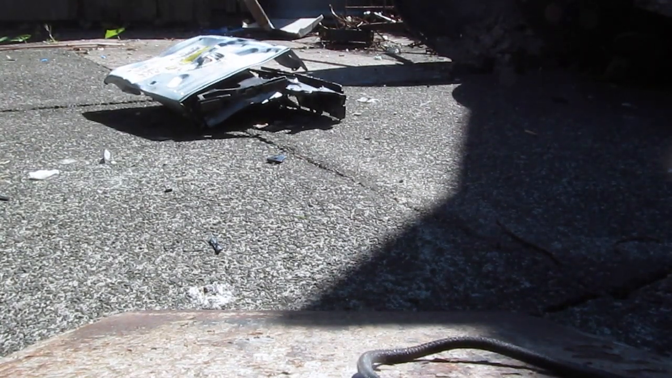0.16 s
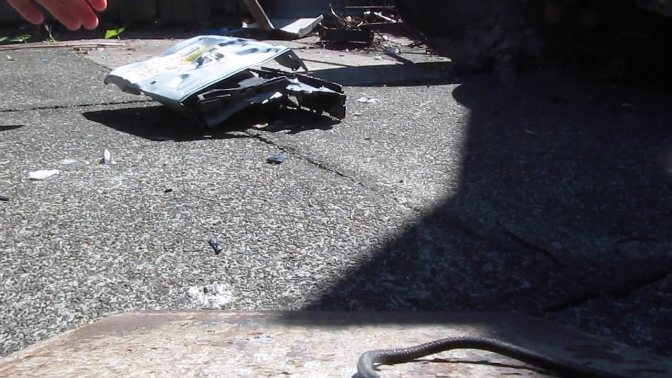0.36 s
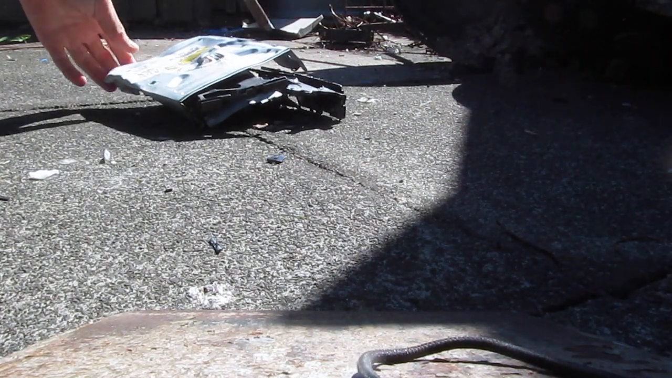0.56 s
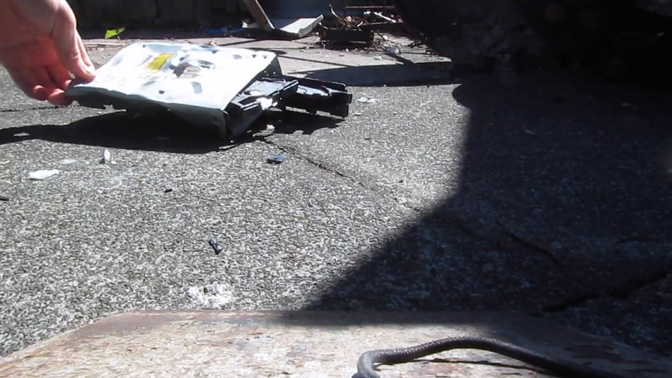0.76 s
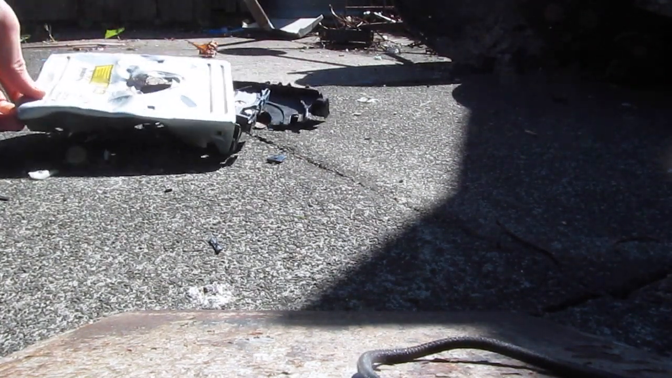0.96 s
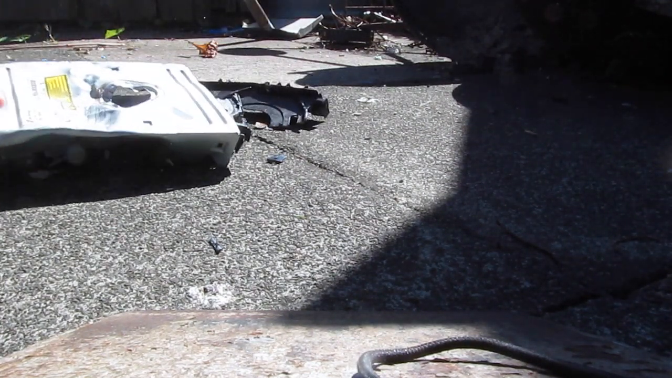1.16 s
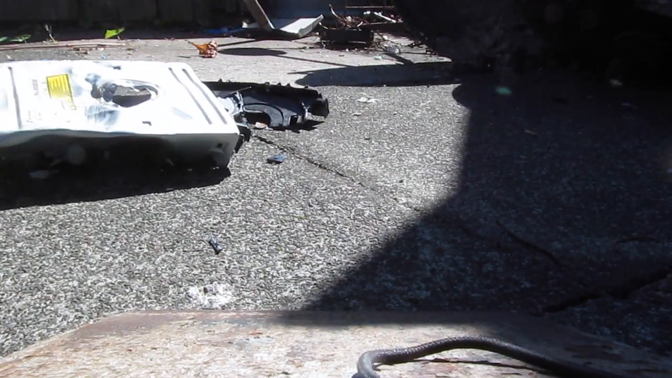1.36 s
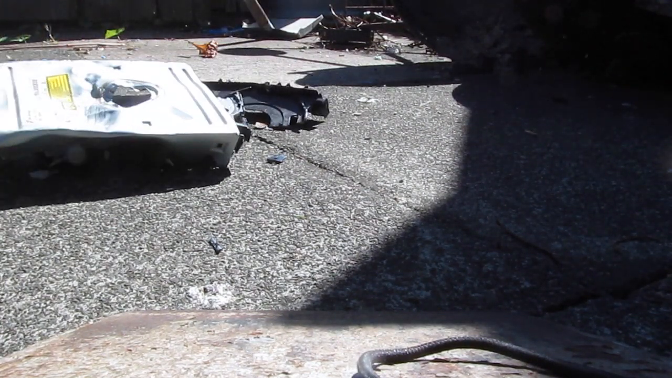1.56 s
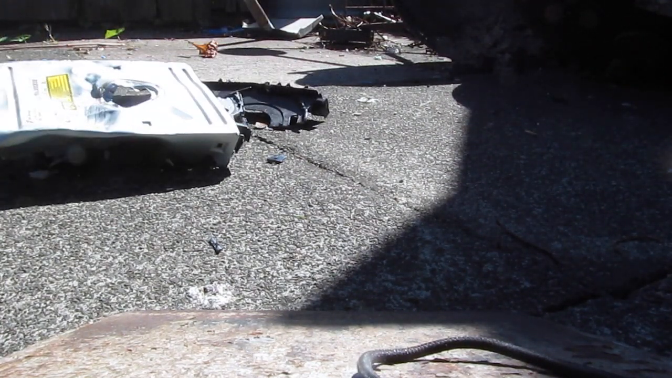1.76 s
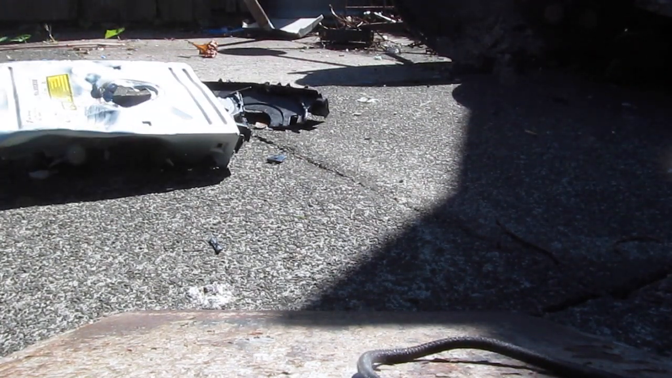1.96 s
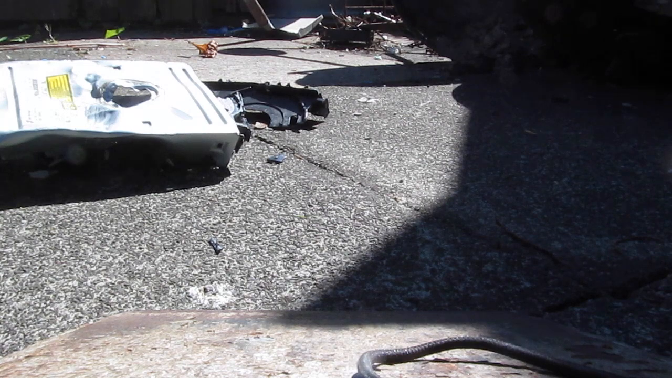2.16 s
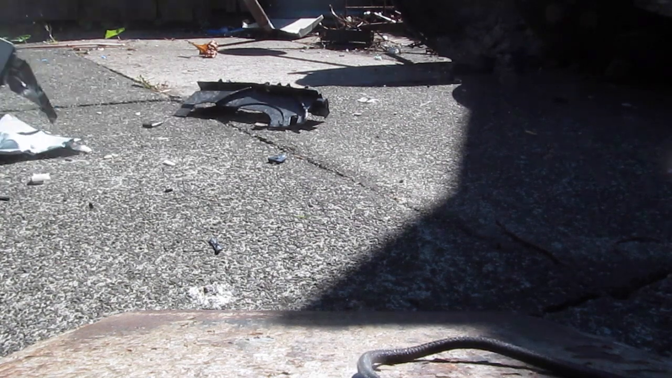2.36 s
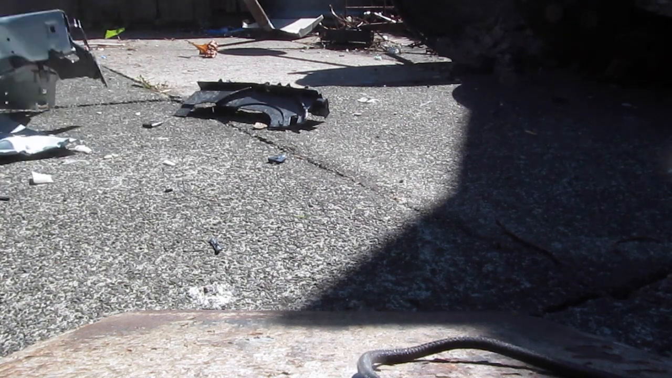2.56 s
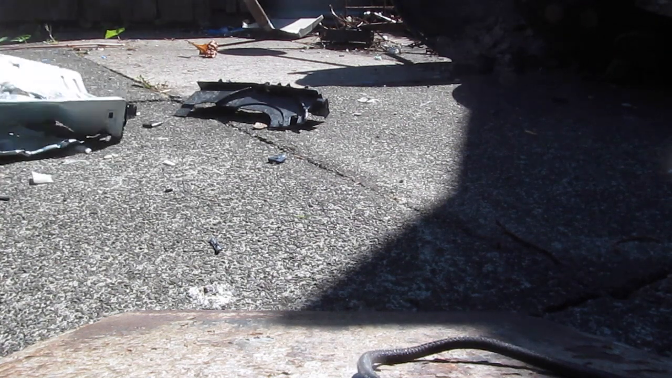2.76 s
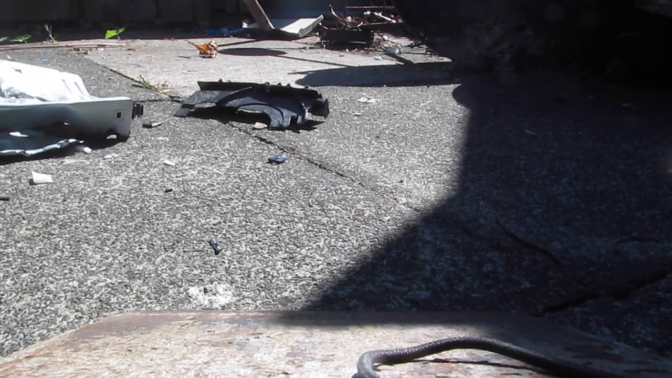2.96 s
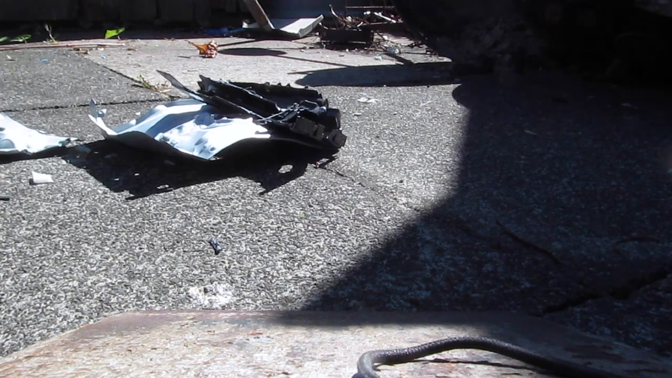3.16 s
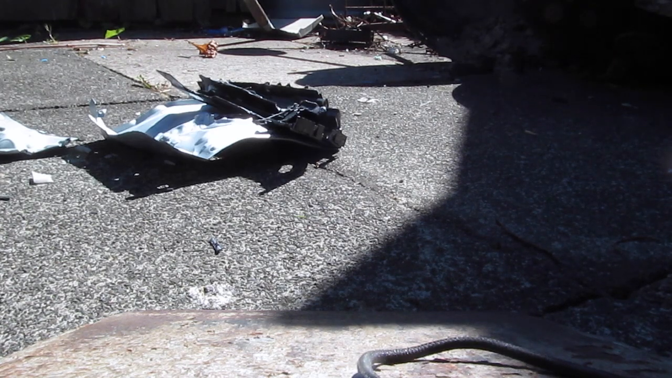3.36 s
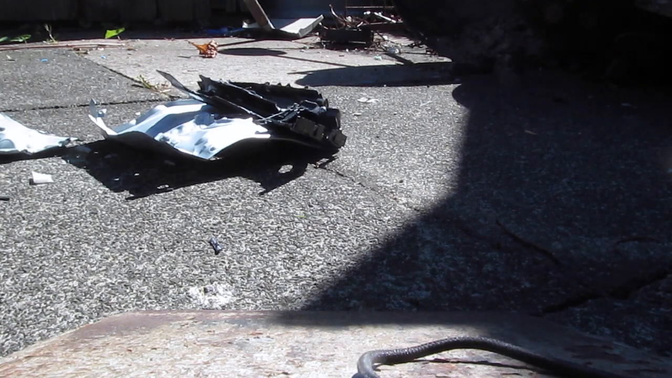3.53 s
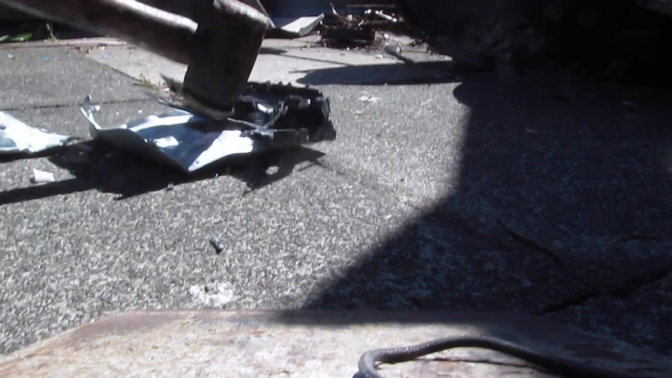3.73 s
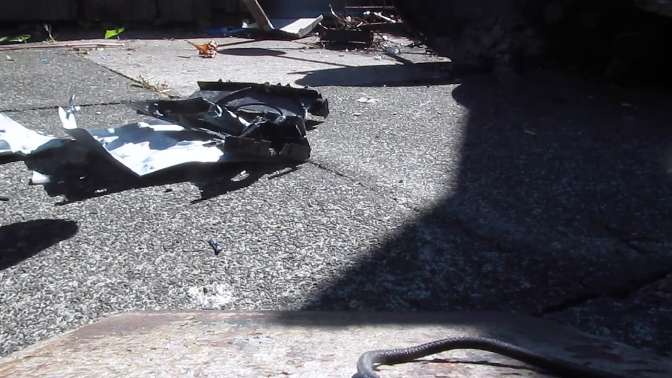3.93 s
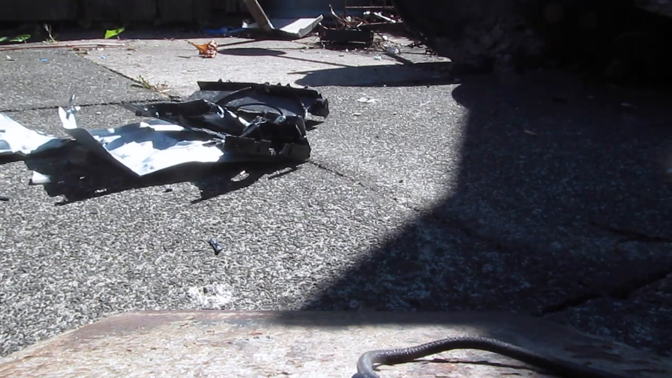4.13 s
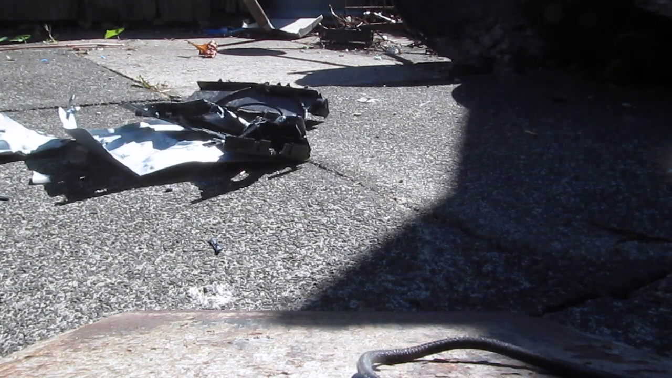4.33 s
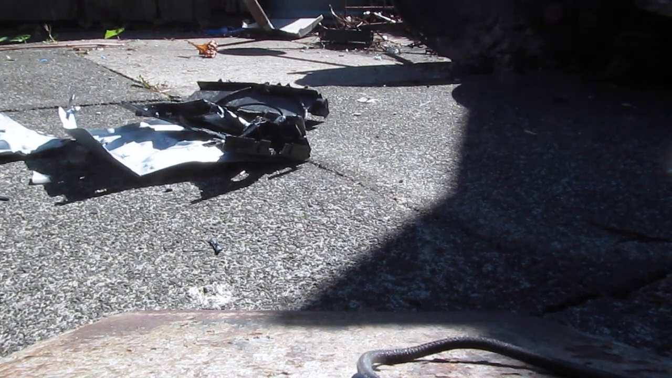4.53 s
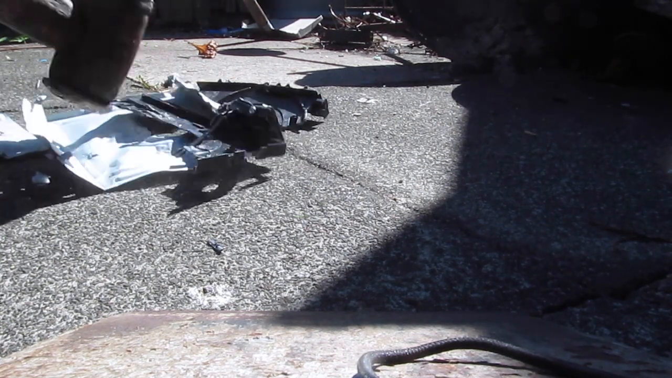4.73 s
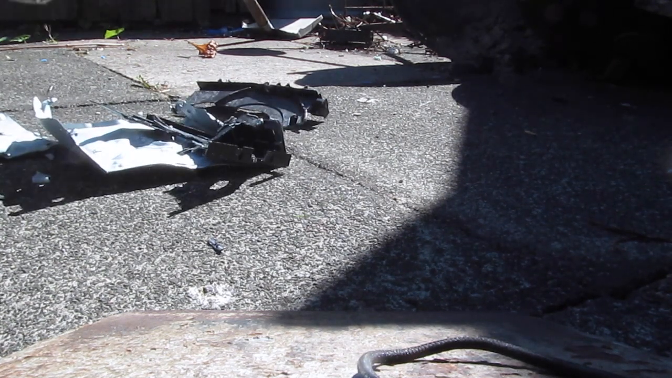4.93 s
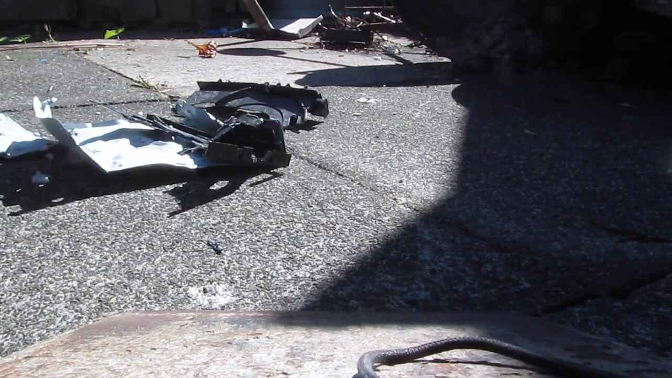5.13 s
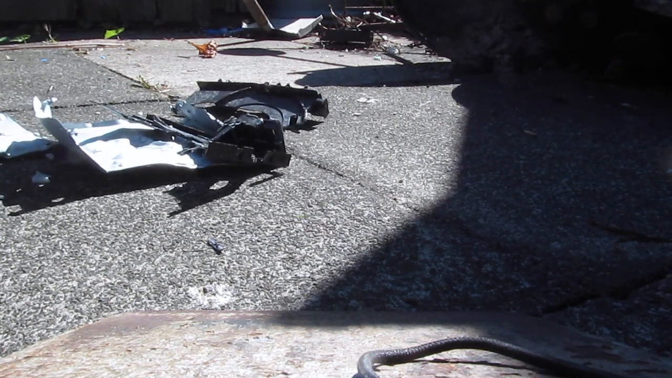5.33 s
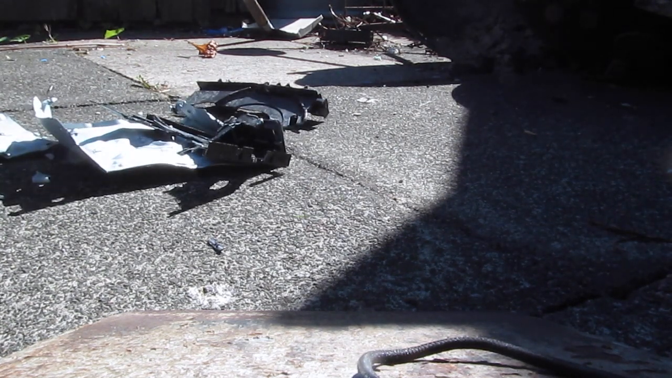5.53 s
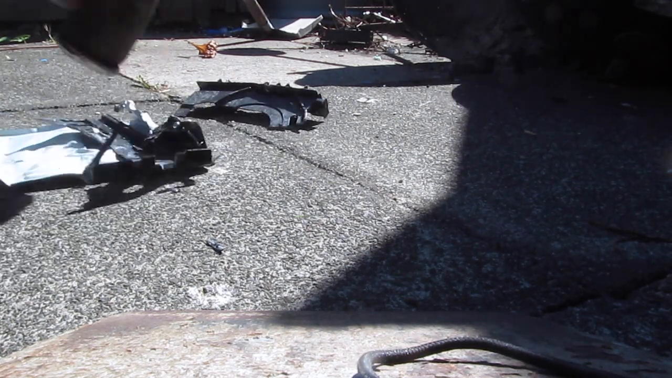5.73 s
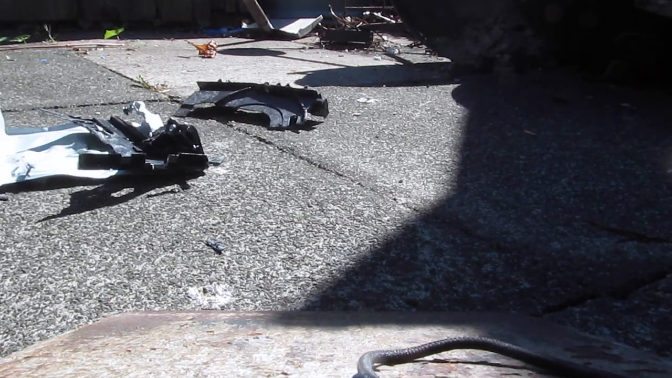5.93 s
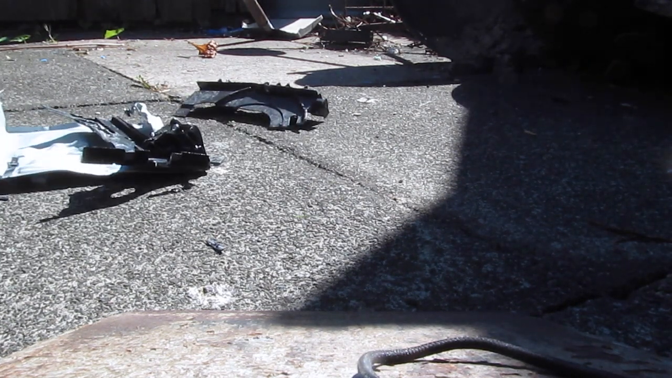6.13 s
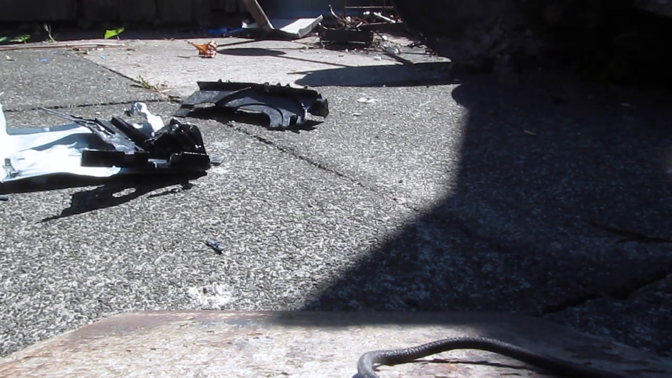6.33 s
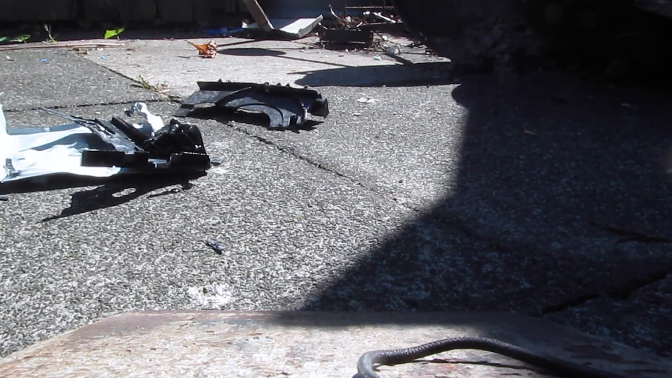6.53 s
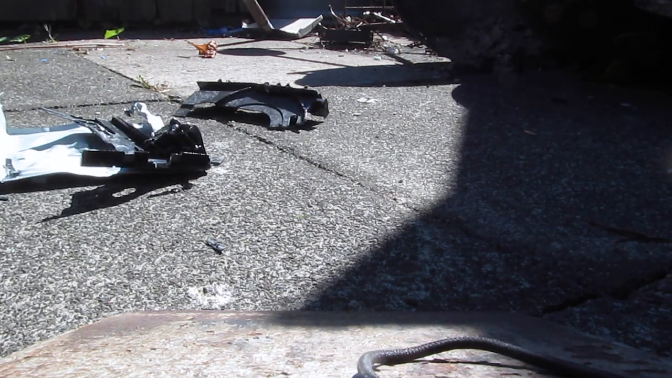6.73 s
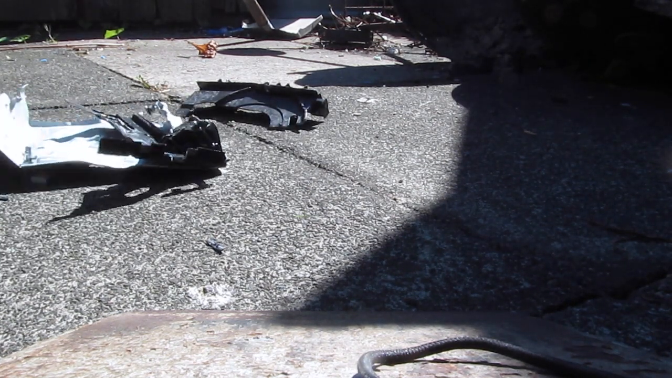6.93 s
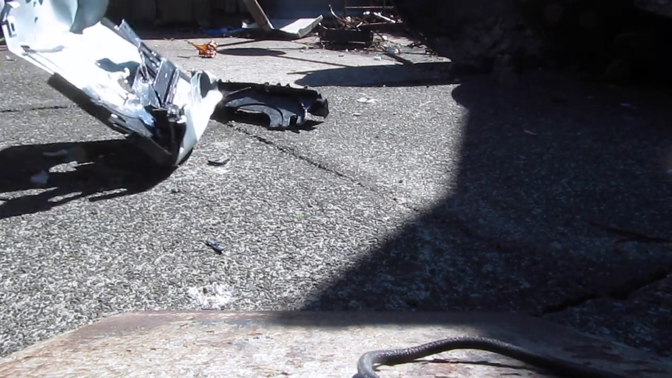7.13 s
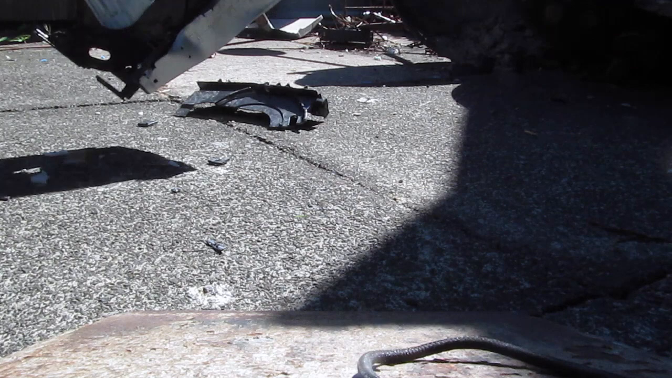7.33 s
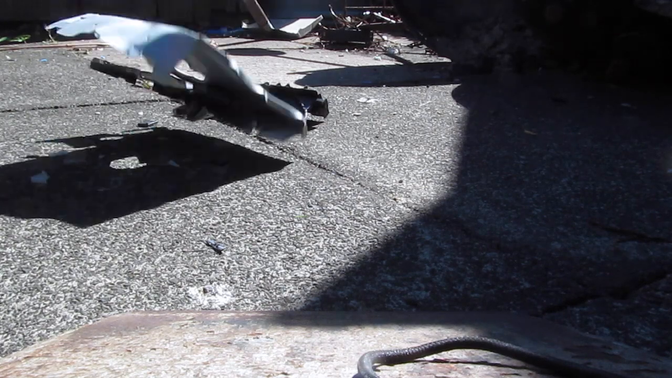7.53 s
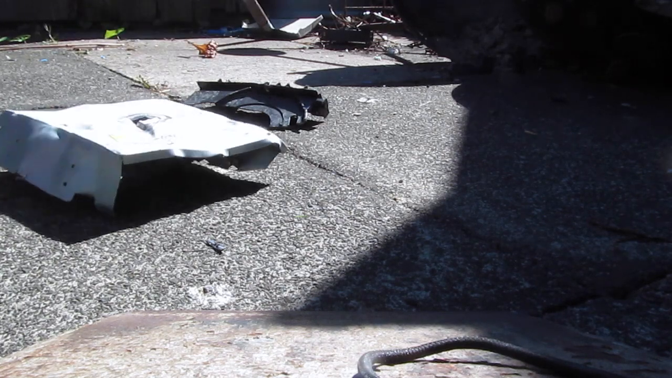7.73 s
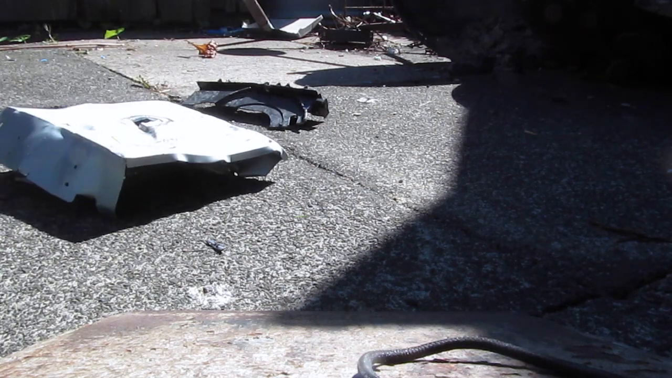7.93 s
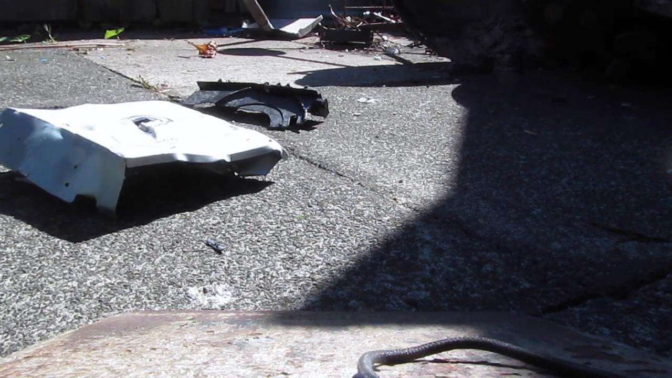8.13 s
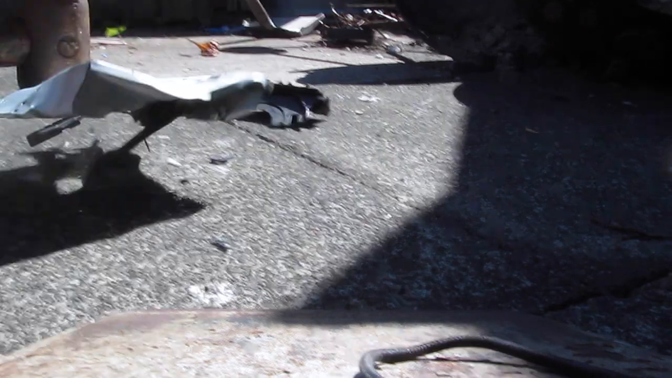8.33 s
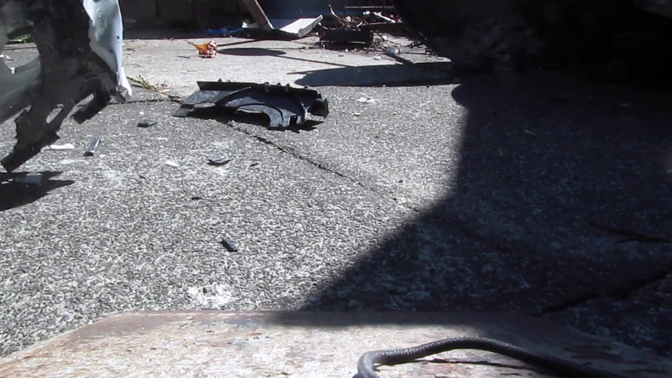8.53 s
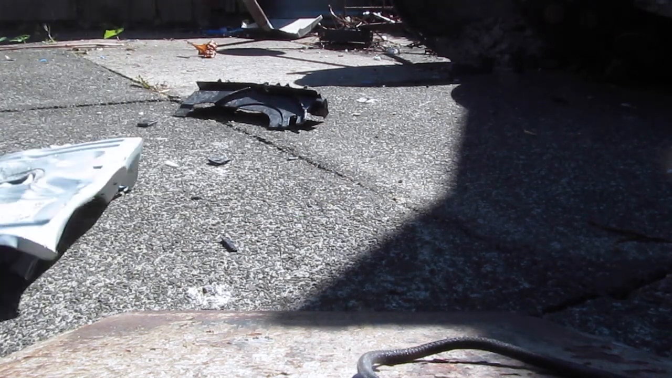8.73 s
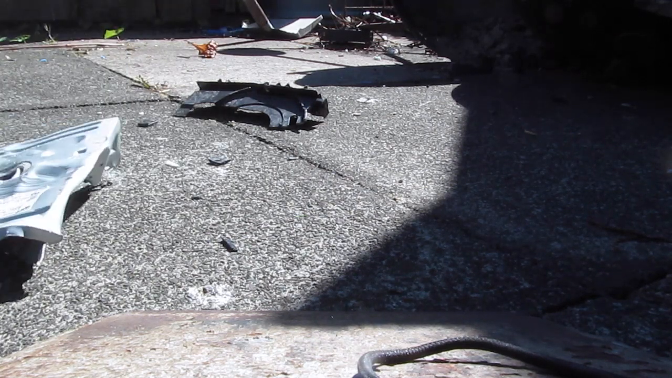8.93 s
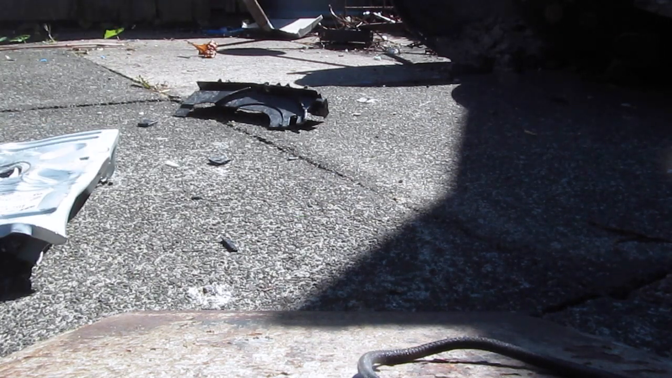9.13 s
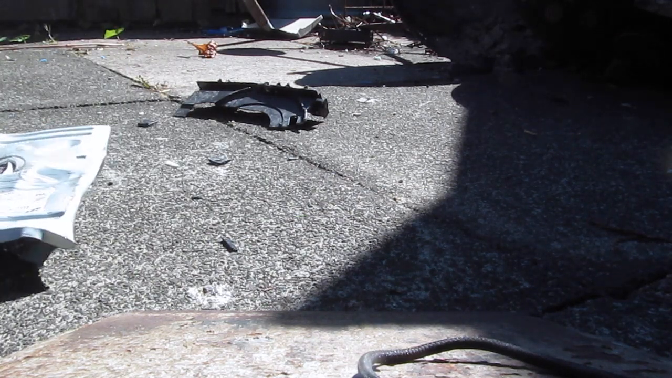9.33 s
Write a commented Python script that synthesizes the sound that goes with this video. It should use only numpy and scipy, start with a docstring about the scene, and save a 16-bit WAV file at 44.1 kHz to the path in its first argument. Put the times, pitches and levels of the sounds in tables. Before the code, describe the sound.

A bent metal and plastic case is scraped briskly across concrete paving, ringing thinly, then settles. A sledgehammer hits it five times with sharp, distorted cracks and short low thuds. After each blow the case skids, rattles and clinks; later it is turned over and dropped with a clatter before the last hit. Close stereo microphone outdoors between walls, short dull reflections, faint town hum.

```python
"""Outdoors between walls, over a faint town hum: a crumpled sheet metal and plastic case is dragged
over concrete paving and smashed with a sledgehammer, heard at two close microphone ports.
Contacts are rattle bursts ringing panel modes; slides are clumped grit through the same modes.
Blows also ring the slab low, free panels sing on, and filtered noise makes the town hum."""
import sys
import numpy as np
from scipy import signal
from scipy.fft import rfft, irfft
from scipy.io import wavfile
from scipy.ndimage import uniform_filter1d

SR = 44100
rng = np.random.default_rng(int(sys.argv[2]) if len(sys.argv) > 2 else 0)


def store_wav(level_fs):
    """Save 16-bit WAV to argv[1]."""
    pcm = np.round(np.clip(np.atleast_2d(level_fs), -1, 1) * 32767)
    wavfile.write(sys.argv[1], SR, pcm.T.astype(np.int16))


N = 413658

# lows, mids, highs: low_edge_hz, high_edge_hz
SPLIT_HZ = [(150, 1300), (1300, 5500), (5500, 19000)]


def from_db(db):
    """Decibels to gain."""
    return 10 ** (np.asarray(db) / 20)


def rms_one(x):
    """Scaled to rms 1."""
    return x / np.sqrt(np.mean(x ** 2) + 1e-20)


def peak_one(x):
    """Scaled to peak 1."""
    return x / np.max(np.abs(x))


def band(x, low_hz, high_hz, order=2):
    """Butterworth band-pass."""
    sos = signal.butter(order, [low_hz, high_hz], "band", fs=SR, output="sos")
    return signal.sosfilt(sos, x)


def coloured(x, spectrum):
    """Minimum-phase filter with the given spectrum, so nothing sounds early."""
    hz = np.maximum(np.fft.rfftfreq(4096, 1 / SR), 10)
    point_hz, point_db = np.transpose(spectrum)
    log_gain = np.interp(np.log(hz), np.log(point_hz), point_db) * np.log(10) / 20
    cepstrum = irfft(log_gain)
    cepstrum[1:2048] *= 2   # fold onto positive time
    cepstrum[2049:] = 0
    impulse = irfft(np.exp(rfft(cepstrum)))
    return signal.fftconvolve(x, impulse[None], axes=1)[:, :x.shape[1]]


def resonance(x, hz, width_hz):
    """Two-pole peak of gain 1."""
    r = np.exp(-np.pi * width_hz / SR)
    zeros = np.array([1, 0, -1]) * (1 - r * r) / 2
    poles = [1, -2 * r * np.cos(2 * np.pi * hz / SR), r * r]
    return signal.lfilter(zeros, poles, x)


# far traffic and air, relative spectrum: pitch_hz, density_db_per_hz
TOWN_SPECTRUM = [(20, -34.5), (60, -3.5), (200, -6), (650, -5.5), (1500, -12.5), (3000, -22.5), (7000, -27),
                 (16000, -52)]
# town levels: time_s, hum_130_to_2000_hz_db_rms, rumble_db_rms
TOWN_LEVELS = [(0, -75.5, -71.5), (0.898, -64, -75), (1.6, -71, -68), (2.1, -64, -68.5),
               (3.202, -63.5, -76), (3.6, -60, -61.5), (4.101, -75, -77), (5.201, -68.5, -81),
               (6.502, -69.5, -82), (7.201, -68, -68), (8.0, -68, -72), (9.38, -67.5, -75)]


def town():
    """Far traffic and air: smooth noise, with a low rumble that comes and goes."""
    s, hum_db, rumble_db = np.transpose(TOWN_LEVELS)
    t = np.arange(N) / SR
    common, left, right, low = rng.standard_normal((4, N))
    hum = coloured(np.array([common + .5 * left, common + .5 * right]), TOWN_SPECTRUM)
    hum = hum / np.sqrt(np.mean(band(hum, 130, 2000) ** 2))
    rumble = rms_one(band(low + .5 * np.array([left, right]), 33, 120, order=1))
    hum_gain = from_db(np.interp(t, s, hum_db))
    rumble_gain = from_db(np.interp(t, s, rumble_db))
    return hum_gain * hum + rumble_gain * rumble


# broad colour of a contact, relative: pitch_hz, density_db_per_hz
BODY = [(100, -39), (300, -13), (700, -5.5), (1300, -5), (2200, 0.5), (3500, -0.5), (6500, -9),
        (12000, -12.5), (16500, -23)]


def grit(per_s, spread_db):
    """Tiny uneven contacts coloured by the case; both ports hear nearly the same; rms near 1."""
    alike = .8   # left-right likeness, 0 to 1
    size_db = spread_db * np.minimum(rng.exponential(1, (2, N)), 4)
    sizes = from_db(size_db) * rng.choice([-1, 1], (2, N))
    ticks = sizes * (rng.random((2, N)) < per_s / SR)
    mid, side = rms_one(coloured(ticks, BODY))
    sides = np.sqrt(1 - alike) * side * np.array([[1], [-1]])
    return (np.sqrt(1 + alike) * mid + sides) / np.sqrt(2)


# panel modes, widths before damping: pitch_hz, width_hz, level_db
SHEET = [(354, 10, -8), (603, 15, -7.5), (950.3, 19, -3.5), (1144, 14, -4), (1380, 45, -1), (1685, 50, -4),
         (1928, 22, -8), (2212, 12, -3.5), (2688, 16, -7), (3113, 22, -10), (3630, 20, -7.5),
         (4460, 67, -8.5), (5100, 58, -6), (5360, 23, -7.5), (5850, 45, -8), (6560, 68, -5)]


def sheet(x, strengths_db, narrow, bend=1):
    """The dented panels ring at their modes, each as strongly as the contact point allows."""
    out = 0
    for k, ((hz, width_hz, level_db), strength_db) in enumerate(zip(SHEET, strengths_db)):
        mode = resonance(from_db(strength_db) * x, bend * hz, narrow * width_hz)
        out = out + from_db(level_db) * mode * (-1) ** k
    return out


def flexed(x):
    """The case flexes as it moves, so all its pitches wander (reading speed wavers)."""
    wander = .03   # rms, as a fraction of speed at each step
    steps = np.linspace(0, N, num=200)
    speed = 1 + wander * np.interp(np.arange(N), steps, rng.standard_normal(len(steps)))
    at = np.cumsum(speed)
    at += np.arange(N) - uniform_filter1d(at, size=SR // 4, mode="nearest")   # no lasting slip
    return np.array([np.interp(at, np.arange(N), row) for row in x])


# case pulled by hand: time_s, level_db_rms, highs_re_level_db
DRAG = [(0.551, -65.5, -11), (.61, -56, -28), (.7, -45.5, 4.5), (0.788, -24, 3), (.93, -26, -1.5),
        (.98, -23, -1.5), (1.14, -26.5, -4.5), (1.188, -31, -14.5), (1.242, -64.5, -11)]


def drag_gains(t):
    """Level and highs gains as the case is pulled over the paving by hand."""
    s, level_db, high_db = np.transpose(DRAG)
    level = from_db(np.interp(t, s, level_db, left=-200, right=-200))
    return level, level * from_db(np.interp(t, s, high_db))


def slides():
    """Edges catch on concrete grains in clumps; which panels ring keeps changing as the case rocks."""
    rumble_re_level_db, ring_db = -29, 13.0
    t = np.arange(N) / SR
    level, highs = np.add(drag_gains(t), skid_gains(t))
    clumps = from_db(3.3 * rms_one(band(rng.standard_normal(N), 15, 90)))
    scrape = grit(per_s=6000, spread_db=0.0) * clumps
    steps = np.linspace(0, t[-1], num=280)   # about 30 changes a second
    draws_db = rng.normal(0, 5, (len(SHEET), len(steps)))
    rocking_db = [np.interp(t, steps, row) for row in draws_db]
    scrape = scrape + from_db(ring_db) * flexed(sheet(scrape, rocking_db, narrow=0.89))
    rumble = from_db(rumble_re_level_db) * rms_one(band(scrape, 140, 380))
    high_edges_hz = SPLIT_HZ[-1]
    body = rms_one(band(scrape, 580, high_edges_hz[0]))
    return level * (body - rumble) - highs * rms_one(band(scrape, *high_edges_hz))


def contacts(rows, pans_db, rise_s, crack_db, sheet_db, ring_db):
    """Each contact: a short crack, then a burst of rattle that dies away and sets the panels ringing."""
    redent = .05   # rms pitch change from one contact to the next, fraction
    out, t = np.zeros((2, N)), np.arange(SR // 2) / SR
    rattle = grit(per_s=8000, spread_db=2.5)
    strengths = rng.standard_normal((len(rows), len(SHEET) + 1))
    for row, pan_db, strength in zip(rows, pans_db, strengths):
        start_s, mid_peak_db, low_db, high_db, t60_s, ring_hz, *_ = row
        at = round(start_s * SR)
        n = min(len(t), N - at, int(1.5 * t60_s * SR) + SR // 8)
        u = t[:n]
        fade = from_db(-60 * u / t60_s) + from_db(crack_db - 60 * u / 0.01)
        burst = rattle[:, at:at + n] * fade * np.minimum(u / rise_s, 1)
        damping = np.clip(.07 / t60_s, .8, 3)   # a dry contact widens every mode
        bend = 1 + redent * strength[0]
        ringing = from_db(sheet_db) * sheet(burst, 3.5 * strength[1:], damping, bend)
        ringing += from_db(ring_db) * resonance(burst, ring_hz, 80 * damping)
        burst = burst + ringing
        lows, mids, highs = (peak_one(band(burst, *edges_hz)) for edges_hz in SPLIT_HZ)
        # neighbouring bands meet in opposite phase
        mix = from_db(low_db) * lows - mids + from_db(high_db) * highs
        port_db = mid_peak_db + np.array([[pan_db], [-pan_db]]) / 2
        out[:, at:at + n] += from_db(port_db) * mix
    return out


# case and loose bits on paving: start_s, mid_peak_db, highs_re_mids_db, t60_s, ring_hz
KNOCKS = [(0.609, -40.5, -18, 0.067, 1290), (.631, -24, -2, 0.097, 4270), (0.697, -20.5, -1.5, 0.22, 1790),
          (0.7365, -23, -7, 0.057, 2550), (1.2514, -37.5, -9.5, 0.08, 3640), (1.8255, -39, -4, 0.06, 2600),
          (2.0258, -56, 15.5, 0.028, 3370), (2.3164, -24, -14, 0.55, 1310), (2.3338, -17, -15, 0.16, 1970),
          (2.4357, -15.5, -15, 0.2, 3065), (2.531, -28, -14, 0.15, 1570), (2.5693, -17.5, -13, 0.09, 2600),
          (2.593, -15, -14, 0.099, 1640), (2.6426, -18, -17, 0.097, 2840), (2.658, -24.5, -4, 0.14, 1560),
          (2.712, -31.5, -13, 0.08, 3000), (2.7481, -20.5, -9.5, 0.054, 1580),
          (2.799, -24, -25, 0.12, 2460), (2.823, -19.5, -8, 0.064, 2580), (2.8972, -31, -33, 0.18, 2740),
          (2.9478, -27.5, -21, 0.07, 2970), (2.9732, -22, -12, 0.023, 2860), (3.661, -48.5, 2, 0.058, 2600),
          (3.845, -25, -12, .083, 2500), (3.894, -25, -9, 0.25, 3540), (3.909, -26, -1, 0.051, 4430),
          (4.781, -25.5, -2, 0.12, 4500), (4.803, -22, 5.5, 0.07, 3950), (4.843, -20.5, -5.5, 0.2, 3870),
          (4.9489, -27.5, -15, 0.16, 1280), (5.03, -25.5, 5.5, 0.054, 2000),
          (5.1825, -29, 4.5, 0.051, 2270), (5.226, -37, -2, 0.057, 1980), (5.249, -56, 12, 0.052, 3600),
          (5.3103, -36.5, 5.5, 0.078, 3200), (5.38, -47, 10, 0.059, 3420), (5.539, -53, 2.5, .06, 4440),
          (5.627, -11, -8, 0.008, 2400), (5.6844, -17, 1.5, 0.089, 3420), (5.7515, -12.5, -12, 0.12, 2520),
          (5.857, -28.5, -6.5, 0.26, 3690), (5.9443, -31, -1, 0.052, 1960), (6, -20.5, -18, 0.17, 3090),
          (6.0195, -12, -5, 0.087, 1730), (6.0759, -20, -18, 0.32, 840), (6.1651, -20, -7, 0.18, 2760),
          (6.186, -15.5, -10, 0.19, 2030), (6.8803, -21.5, -12.5, 0.14, 1540),
          (6.9326, -24, -21, 0.054, 1500), (6.945, -18, -3.5, 0.085, 1510),
          (7.1533, -43.5, -27, 0.15, 1970), (7.5331, -13.5, 6, 0.12, 1700), (7.5738, -7, 5, 0.034, 3800),
          (7.648, -11.5, -1.5, 0.082, 1630), (7.7154, -16, 6, 0.14, 2630), (7.966, -39, 7.5, 0.1, 1550),
          (8.26, -48.5, -0.5, 0.033, 3160), (8.527, -43.5, 9, 0.057, 2460), (8.577, -52.5, 12, 0.12, 3040),
          (8.729, -18.5, -1, 0.081, 2230), (8.739, -11.5, -5, 0.07, 2155), (8.76, -20.5, -3, 0.13, 1940),
          (8.8493, -20, -1.5, .11, 1430), (8.907, -22, -3.5, 0.11, 1910), (9.027, -34.5, -9, 0.075, 1430),
          (9.0472, -25, -4.5, 0.25, 1470), (9.22, -51.5, 0, 0.11, 2450), (9.321, -42, -2.5, 0.044, 4440)]


def knocks():
    """Case and loose bits touch the paving; harder knocks are thinner."""
    lows_db, lows_per_db = -11.5, -0.05   # lows re mids at 0 dB peak; change per dB of peak
    touches = [(s, db, lows_db + lows_per_db * db, *rest) for s, db, *rest in KNOCKS]
    pans_db = rng.normal(0, 1.5, len(KNOCKS))
    return contacts(touches, pans_db, rise_s=.001, crack_db=5, sheet_db=11, ring_db=12)


# free panels singing: start_s, end_s, pitch_hz, width_hz, level_db_rms
PANELS = [(.77, 1.2, 940, 30, -46), (.93, 1.12, 1960, 310, -28.5), (0.868, 1.123, 3110, 350, -24),
          (0.757, .86, 4050, 64, -28), (.9, 1.04, 4230, 110, -36), (1.15, 1.22, 1635, 5.5, -51),
          (2.287, 2.448, 1340, 13, -40.5), (2.334, 2.49, 2050, 45, -39), (2.306, 2.457, 743, 40, -49.5),
          (2.52, 2.68, 998, 27, -52.5), (2.743, 2.858, 337, 16, -60.5), (3.953, 4.016, 650, 6, -69),
          (5.761, 5.985, 943, 50, -49), (6.014, 6.064, 3045, 40, -39), (6.02, 6.14, 1744, 13, -39),
          (6.18, 6.25, 3810, 26, -43), (6.242, 6.32, 679, 5.7, -67.5), (7.459, 7.516, 1570, 23, -58.5),
          (7.53, 7.591, 495, 16, -41), (7.572, 7.59, 3650, 200, -22), (7.62, 7.787, 553, 28, -53.5),
          (7.526, 7.774, 226, 66, -47.5), (8.35, 8.405, 1222, 7.7, -43.5), (8.357, 8.49, 2250, 45, -47),
          (8.42, 8.53, 1490, 20, -55), (9.317, 9.319, 4480, 70, -39.5), (8.764, 9.16, 353.4, 24, -57),
          (8.748, 9.153, 780, 28, -55), (8.9, 8.95, 1180, 51, -46), (8.84, 9.16, 1500, 24, -48.5),
          (8.84, 9.16, 1935, 16, -48)]


def panels(shake):
    """A panel mode, narrow or broad, fed by blows, knocks and slides while free, then left to ring out."""
    t, out = np.arange(N) / SR, np.zeros(N)
    for start_s, end_s, hz, width_hz, level_db in PANELS:
        span = slice(int(start_s * SR), int(end_s * SR) + SR // 2)
        feed = shake[span] * (t[span] < end_s)
        song = resonance(resonance(feed, hz, 8 * width_hz), hz, width_hz)
        # all its energy, tail included, counted over start to end
        song_rms = np.sqrt(np.sum(song ** 2) / SR / (end_s - start_s))
        out[span] += from_db(level_db) * song / song_rms
    return out


# short skids of the knocked case: start_s, end_s, start_level_db_rms, highs_re_level_db
SKIDS = [(1.79, 1.88, -56, 5), (2.358, 2.515, -36, -15), (2.59, 2.715, -47.5, -17), (2.73, 2.9, -46, -25),
         (2.978, 3.028, -38, -21), (3.751, 3.854, -33.5, -14.5), (3.882, 3.957, -37.5, -11),
         (4.676, 4.744, -34, -13), (4.851, 4.878, -38.5, -0.5), (5.438, 5.48, -61, -21.5),
         (5.7, 5.858, -40.5, -1), (5.899, 6.028, -38, -16), (6.046, 6.152, -38, -6),
         (6.222, 6.379, -57, -5.5), (6.894, 7.013, -43, 2), (7.042, 7.065, -48, -3.5),
         (7.482, 7.52, -64, -1.5), (7.614, 7.75, -46.5, 14.5), (7.748, 7.826, -39.5, 5.5),
         (8.436, 8.484, -42.5, -3), (8.851, 8.959, -46, 0.5), (9.084, 9.137, -42.5, -1),
         (9.356, 9.387, -46, -23)]


def skid_gains(t):
    """Level and highs gains as each skid sets in, loses speed and comes to rest."""
    grip_db_per_s, slowing_db_per_s, stop_db_per_s = 699.5, 48, 461
    level, highs = np.zeros(N), np.zeros(N)
    for start_s, end_s, level_db, high_db in SKIDS:
        span = slice(int((start_s - .2) * SR), int((end_s + .3) * SR))
        u = t[span]
        skid_db = level_db - grip_db_per_s * np.maximum(start_s - u, 0)
        skid_db -= slowing_db_per_s * np.clip(u - start_s, 0, end_s - start_s)
        skid_db -= stop_db_per_s * np.maximum(u - end_s, 0)
        skid = from_db(skid_db)
        level[span] += skid
        highs[span] += from_db(high_db) * skid
    return level, highs


# sledgehammer on the case: start_s, mid_peak_db, lows_re_mids_db, highs_re_mids_db, t60_s,
# ring_hz, left_re_right_db, ground_push_db
BLOWS = [(2.2133, -2.5, 0.5, 1.5, 0.16, 1022, 1, -46.5), (3.729, 3.5, -2.5, 3, 0.1, 2190, 0.5, -43.5),
         (4.6218, -3.5, 5, 5.5, 0.12, 567.5, -1, -43.5), (5.6456, 2, -7, 0.5, 0.11, 3700, 3.5, -44.5),
         (8.33, -1, 2, -3, 0.17, 2900, -0.5, -46)]


def blows():
    """Sledgehammer hits: contacts with a steep rise and a strong crack."""
    pans_db = np.array(BLOWS)[:, 6]
    return contacts(BLOWS, pans_db, rise_s=0.00035, crack_db=11, sheet_db=-1, ring_db=-0.5)


# paving modes under a blow: pitch_hz, level_re_push_db, t60_s
THUD = [(45, -2.5, 0.46), (98, 7, 0.16), (152, 8, 0.12), (225.4, 18.5, 0.042), (605, 26.5, 0.084)]


def thuds():
    """The hammer's push into the ground rings the slab low, as decaying sines."""
    push, out = np.zeros(N), np.zeros(N)
    for start_s, *_, push_db in BLOWS:
        push[round(start_s * SR)] = from_db(push_db)
    for hz, level_db, t60_s in THUD:
        r, w = from_db(-60 / (t60_s * SR)), 2 * np.pi * hz / SR
        gain = from_db(level_db) * np.sin(w)
        out += signal.lfilter([0, gain], [1, -2 * r * np.cos(w), r * r], push + 1e-18)
    return out


# hammer head set on the case to take aim: start_s, peak_db
TAPS = [(3.59, -30), (4.505, -29.5), (8.262, -40.5)]


def taps():
    """A dull, dry knock: a few milliseconds of noise, mostly under 2 kHz."""
    out, t = np.zeros(N), np.arange(SR // 10) / SR
    noises = rng.standard_normal((len(TAPS), len(t)))
    for (start_s, peak_db), noise in zip(TAPS, noises):
        at = round(start_s * SR)
        knock = band(noise * from_db(-60 * t / .035), 500, 1900)
        out[at:at + len(t)] += from_db(peak_db) * peak_one(knock)
    return out


def walls(x):
    """Scattered, dull reflections from walls and junk, other ones at each port."""
    t60_s, gain_db, first_s = 0.08, -14, .006
    t = np.arange(SR // 4) / SR
    scatter = rng.standard_normal((2, len(t))) * from_db(-60 * t / t60_s) * (t > first_s)
    scatter = band(scatter / np.sqrt(np.sum(scatter[0] ** 2)), 130, 7000, order=1)
    return from_db(gain_db) * signal.fftconvolve(x, scatter, axes=1)[:, :N]


def lagged(x):
    """The farther port hears later: a phase lag that grows with pitch."""
    lag_at_1khz_rad, lag_power = 0.6, 0.36
    hz = np.fft.rfftfreq(N, 1 / SR)
    lag_rad = lag_at_1khz_rad * (hz / 1000) ** lag_power
    return irfft(rfft(x) * np.exp(-1j * lag_rad), N)


def scene():
    """Everything near reaches the left port first; the yard answers; the town lies behind."""
    shaken = blows() + knocks() + slides()
    near = shaken + panels(shaken.mean(axis=0)) + taps() + thuds()
    near[1] = lagged(near[1])
    return near + walls(near) + town()


def record(dry):
    """The loudest peaks clip, the top is cut."""
    cutoff_hz, stop_db = 16400, 60
    sos = signal.cheby2(12, stop_db, cutoff_hz, fs=SR, output="sos")
    return signal.sosfilt(sos, np.clip(dry, -1, 1))


dry = scene()
out = record(dry)
store_wav(out)
```